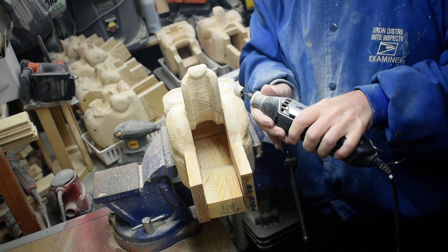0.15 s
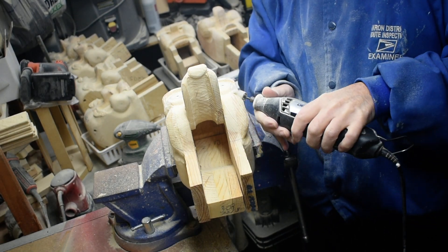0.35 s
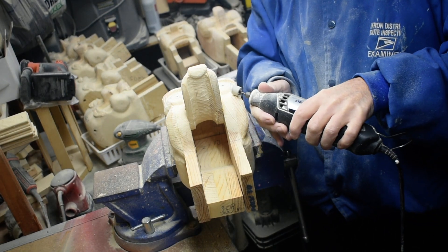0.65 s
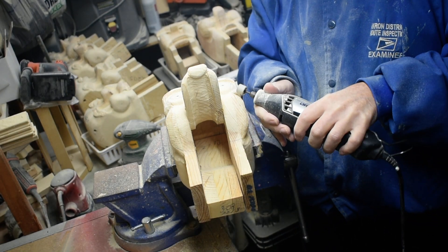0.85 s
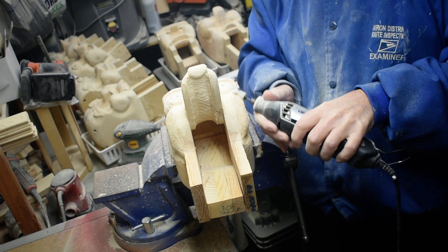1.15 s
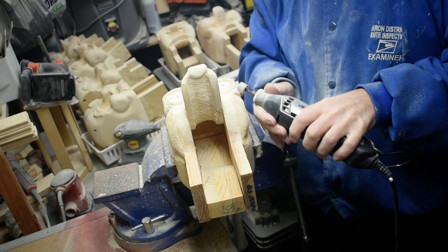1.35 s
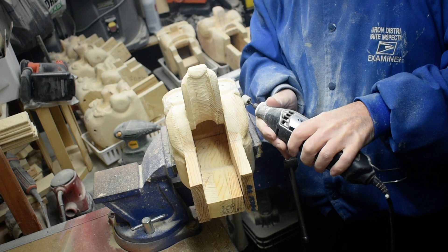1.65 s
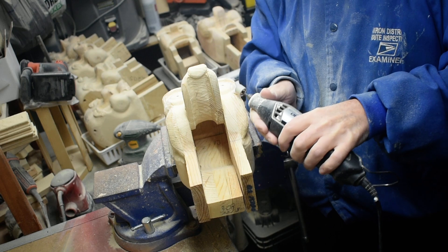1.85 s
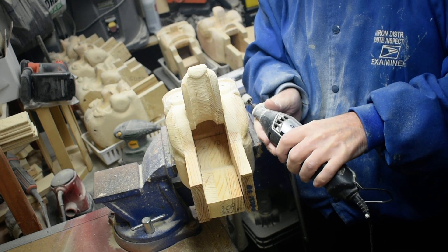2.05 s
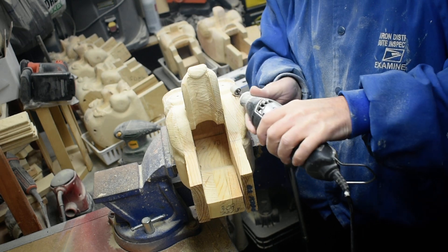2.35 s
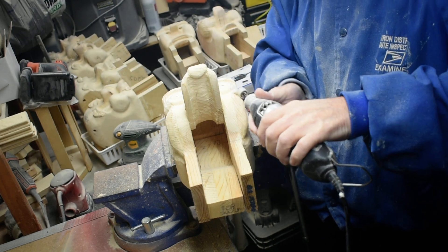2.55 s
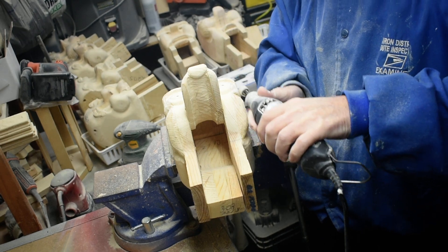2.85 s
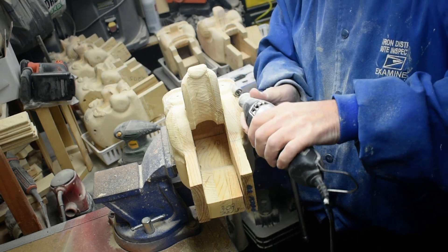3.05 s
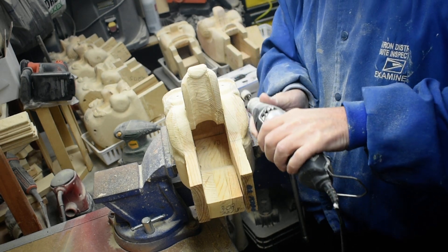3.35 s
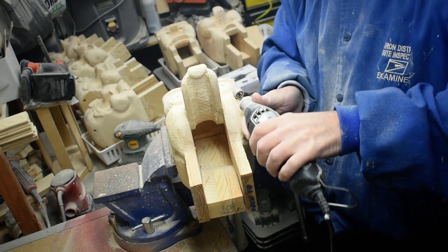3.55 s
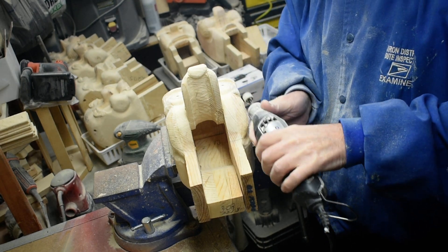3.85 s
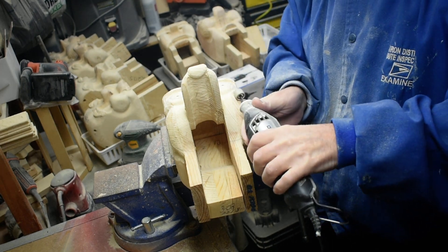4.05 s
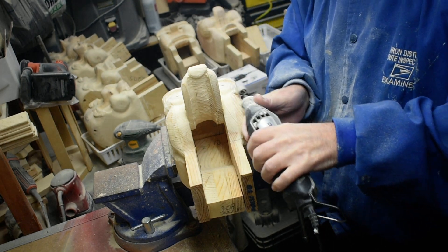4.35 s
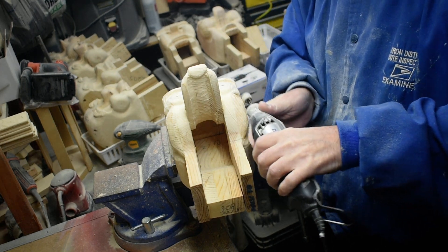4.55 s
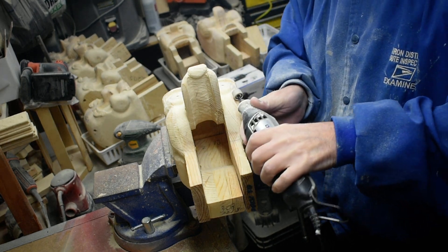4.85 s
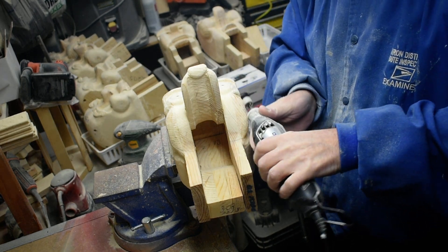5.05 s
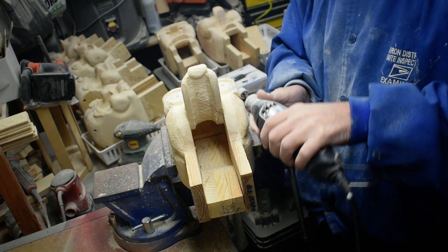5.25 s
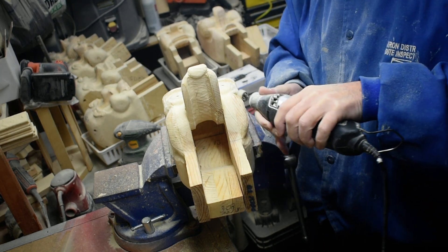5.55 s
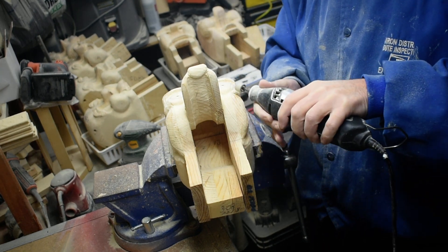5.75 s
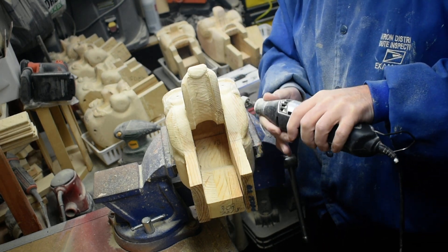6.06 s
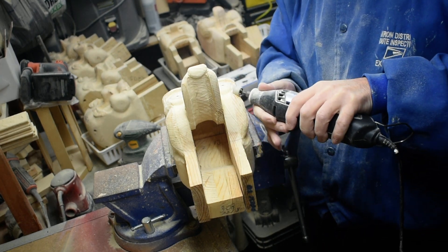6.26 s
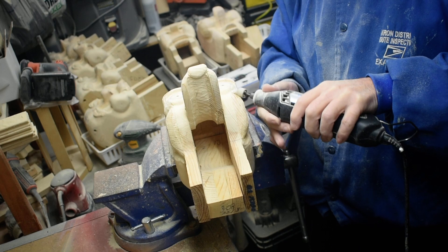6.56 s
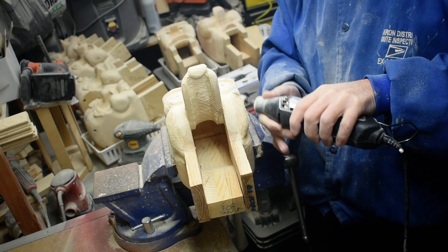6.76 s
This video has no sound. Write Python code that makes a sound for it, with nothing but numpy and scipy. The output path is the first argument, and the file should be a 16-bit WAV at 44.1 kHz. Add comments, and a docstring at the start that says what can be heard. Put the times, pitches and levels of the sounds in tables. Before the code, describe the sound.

A handheld rotary tool whines at high speed, buzzing and dipping in pitch as its bit repeatedly touches wood.

```python
"""Rotary tool carving wood.

A handheld rotary tool whines near full speed in a workshop, close to a mono microphone.
About twice a second its bit touches the wood: the shaft slows and buzzes once per turn,
then spins up again. Brushes and cooling fan hiss; the mains ripple adds side tones."""
import sys
import numpy as np
from scipy import signal
from scipy.io import wavfile
from scipy.ndimage import uniform_filter1d, map_coordinates

SR = 44100
rng = np.random.default_rng(int(sys.argv[2]) if len(sys.argv) > 2 else 0)


def unload_wav(signal):
    """Save mono or channel-first audio to the path in sys.argv[1] as 16-bit WAV at rate SR, clipped to [-1, 1]."""
    wavfile.write(
        sys.argv[1],
        SR,
        np.round(np.clip(np.atleast_2d(signal).T, -1, 1) * 32767).astype(np.int16),
    )


N = 304290
TIME_S = np.arange(N) / SR

# Motor tones as the hands turn the tool. Each row: time in seconds, 12th order in dB, 5th order in dB.
MOTOR_LEVELS = [(0.0, -33, -27), (0.11, -34.5, -46), (0.35, -44, -34), (0.36, -32, -41.5), (0.96, -33, -40),
                (1.06, -35, -32.5), (1.29, -32.5, -40), (1.79, -36.5, -38.5), (1.94, -24.5, -39),
                (1.98, -29.5, -47), (2.06, -31.5, -33.5), (2.54, -26, -33), (2.58, -27.5, -27.5),
                (2.71, -34, -38), (2.77, -32, -32.5), (5.03, -27, -33.5), (5.05, -27, -32),
                (5.38, -31.5, -37), (5.59, -33, -28.5), (5.75, -36.5, -33), (6.76, -33, -40.5),
                (6.9, -33, -35)]
# Commutator whine, fading as the tool moves among reflections. Each row: time in seconds, level in dB.
WHINE_LEVELS = [(0.0, -16), (0.19, -22.5), (0.27, -41), (0.36, -19), (0.46, -28), (0.5, -15), (0.57, -28),
                (0.94, -19.5), (1.06, -36), (1.11, -13.5), (1.25, -29.5), (1.36, -17.5), (1.4, -27),
                (1.67, -17.5), (2.3, -19.5), (2.61, -17), (2.78, -26.5), (2.86, -14.5), (2.96, -21.5),
                (3.28, -14), (3.38, -26), (3.42, -15), (3.8, -18), (4.36, -15), (4.44, -21), (4.65, -13),
                (4.71, -23), (4.84, -11), (4.94, -18.5), (5.01, -11.5), (5.19, -24.5), (5.44, -23.5),
                (5.57, -11), (5.59, -23), (5.69, -17), (5.75, -26.5), (5.8, -16), (6.07, -15.5),
                (6.19, -32.5), (6.47, -12.5), (6.61, -29), (6.63, -19.5), (6.73, -22), (6.76, -33),
                (6.84, -17.5), (6.9, -23)]
# Weaker, constant motor tones. Each row: shaft order, level in dB.
STEADY_ORDERS = [(2, -48), (3, -44.5), (4, -46.5), (6, -55.5), (7, -48), (8, -42.5), (10, -79), (16, -49),
                 (17, -42.5), (21, -42), (22, -57), (23, -43), (25, -44), (36, -49)]
# Side tones above the shaft tone. Each row: ripple multiple, level in dB re the shaft tone.
RIPPLE_SIDEBANDS = [(1, -10), (2, -9.5), (3, -8.5)]
# Strokes of the bit in the wood. Each row: start in seconds, end in seconds, drag as settled speed
# loss in turns per second, then a base buzz level in dB for each of BUZZ_CENTRE_ORDERS.
BIT_STROKES = [(-0.1, 0.047, 40.5, -33.5, -50, -49.0, -58), (0.188, 0.414, 42.6, -37.0, -48, -46.5, -57),
               (0.614, 0.849, 46.6, -45, -41, -51, -60.0), (1.039, 1.226, 63.77, -32, -40.0, -48, -55),
               (1.52, 1.674, 50.8, -30, -38.5, -46, -58), (1.951, 2.106, 62.9, -36.5, -40.5, -44, -56),
               (2.463, 2.741, 73.3, -34.5, -38, -45.5, -57.5), (3.07, 3.263, 93, -35, -38.0, -47, -55),
               (3.592, 3.763, 86.9, -37.5, -37.0, -47, -56),
               (4.089, 4.217, 95.2, -35.5, -35.5, -44.0, -57.0),
               (4.519, 4.597, 114.5, -43, -35.5, -42.5, -60), (4.905, 5.091, 82.9, -40.5, -42.5, -44, -56),
               (5.155, 5.198, 56.74, -62, -36.5, -48.0, -61), (5.434, 5.632, 44.7, -39, -42, -47.0, -54.5),
               (5.907, 6.029, 56.7, -31, -42.5, -47.0, -54),
               (6.268, 6.455, 80.45, -30.5, -43.0, -44.0, -57), (6.705, 6.78, 89.1, -28.5, -42, -47, -50)]
# Centres of the four buzz bands. Each entry: shaft order.
BUZZ_CENTRE_ORDERS = [3, 8, 17, 30]
# Buzz spectrum. Each row: shaft order, gain in dB on the base level.
BUZZ_COLOUR = [(2, -8), (3, -2), (4, -4.5), (6, -1.5), (7, -1), (10, 0.5), (13, 4.5), (16, 4), (20, 11),
               (26, 15.5), (30, 15), (36, 12)]
# Ringing spots of the wood. Each row: start in seconds, length in seconds, shaft order, level in dB.
WOOD_SQUEALS = [(1.128, 0.063, 20, -27), (2.482, 0.08, 8, -41), (2.523, 0.11, 7, -33),
                (3.07, 0.059, 7, -28.5), (3.06, 0.063, 21, -29), (3.604, 0.15, 13, -33),
                (3.664, 0.054, 7, -27), (4.065, 0.07, 9, -37), (4.099, 0.12, 13, -34),
                (4.936, 0.15, 7, -38), (4.995, 0.095, 13, -33), (5.067, 0.11, 8, -40.5),
                (6.349, 0.07, 20, -41), (6.617, 0.12, 8, -45)]
# Hiss spectrum. Each row: frequency in Hz, relative density in dB.
HISS_COLOUR = [(30, -35), (100, -39.5), (220, -37), (330, -24), (600, -23), (800, -12), (1500, -11),
               (2700, -7), (4500, -9), (8000, -5.5), (11700, -7.5), (13200, -12), (14900, -11.5),
               (15900, -21)]
# Resonances in the hiss. Each row: centre in Hz, width in Hz, boost in dB.
SHELL_RESONANCES = [(392, 120, 7.5), (977, 386, 11.5), (1990, 500, 10), (3007, 35, 9), (3880, 360, 5),
                    (5220, 840, 7.5), (6300, 290, 4), (7170, 560, 6), (9330, 870, 4.5), (10520, 120, 13),
                    (12900, 700, 4.5)]

FREE_SPEED_HZ, START_SAG_HZ, INERTIA_S = 466.7, 33.5, 0.62
UNBALANCE_DB, TURN_AWAY_DB_PER_S = -40, -0.25
DAMPING_DB_PER_HZ, DAMPING_S = -0.0313, 0.015  # the wood steadies the bit
DIG_S, LIFT_S = 0.0975, 0.0786
BUZZ_LEAD_S, BUZZ_LAG_S = 0.021, 0.014
LANDING_DB, LIFTING_DB = [-7.5, -0.5, -0.5, -7], [1, -1.5, 0, -2]  # per band, re mid-stroke
RIPPLE_HZ, HUM_DB, HISS_DB = 120, -63.5, -24.5
LOW_CUT_HZ, HIGH_CUT_HZ = 150, 15700


def motor(angle):
    """Commutator, fan blades and unbalance sing on whole orders; the ripple shakes the shaft tone."""
    twelfth_db, fifth_db = curves(MOTOR_LEVELS)
    drag_hz = wood_drag_hz()
    damping_db = DAMPING_DB_PER_HZ * lagged(drag_hz, DAMPING_S, drag_hz[0])
    shaft_db = UNBALANCE_DB + TURN_AWAY_DB_PER_S * TIME_S + damping_db
    ripple = 2 * np.pi * RIPPLE_HZ * TIME_S
    out = tone(24 * angle, curves(WHINE_LEVELS)[0], rough=0.38, waver_hz=48.45)
    out += tone(12 * angle, twelfth_db, rough=0.35, waver_hz=25.99)
    out += tone(5 * angle, fifth_db, rough=0.41, waver_hz=22.09)
    out += tone(angle, shaft_db, rough=0.21, waver_hz=11)
    for order, db in STEADY_ORDERS:
        out += tone(order * angle, db, rough=0.35, waver_hz=9.5)
    for multiple, db in RIPPLE_SIDEBANDS:
        out += tone(angle + multiple * ripple, shaft_db + db, rough=0.23, waver_hz=13)
    return out + tone(2 * ripple, HUM_DB, rough=0.29, waver_hz=11)


def shaft_angle():
    """Shaft angle in radians; inertia rounds every change of load."""
    speed_hz = FREE_SPEED_HZ - lagged(wood_drag_hz(), INERTIA_S, START_SAG_HZ)
    jitter = 1 + 0.00019 * wander(30).real
    return 2 * np.pi * np.cumsum(speed_hz * jitter) / SR


def wood_drag_hz():
    """Load of the wood on the bit, ramping in and out with each stroke."""
    drag_hz = np.zeros(N)
    for start_s, end_s, load_hz, *_ in BIT_STROKES:
        dig = np.clip((TIME_S - start_s) / DIG_S + 0.5, 0, 1)
        lift = np.clip((end_s - TIME_S) / LIFT_S + 0.5, 0, 1)
        drag_hz += load_hz * dig * lift
    return drag_hz


def cutting_buzz(angle):
    """One blow a turn, changing in shape: every order wavers on its own; chips rasp in step."""
    bands_db = contact_db()
    orders, colour_db = np.transpose(BUZZ_COLOUR)
    chatter_db = 3 * wander(32).real  # the bit skips over the grain, shaking the high orders together
    out = np.zeros(N)
    for order in set(range(2, 37)) - {5, 12, 24}:  # these three belong to the motor
        shares = [np.interp(np.log(order), np.log(BUZZ_CENTRE_ORDERS), band) for band in np.eye(4)]
        db = shares @ bands_db + shares[-1] * chatter_db + np.interp(order, orders, colour_db)
        phase = order * angle + rng.uniform(0, 2 * np.pi)
        out += tone(phase, db, rough=1.52, waver_hz=16 + 1.6 * order)
    chips = np.diff(rng.standard_normal(N + 1)) * np.exp(0.8 * np.cos(angle))
    rasp_db = bands_db[-1] + 13 + chatter_db
    return out + gain_of(rasp_db) * unit_rms(chips)


def contact_db():
    """Buzz band levels over time: the bit lands quickly, digs in and lifts a little slower."""
    bands_db = np.full((len(BUZZ_CENTRE_ORDERS), N), -99.0)
    for start_s, end_s, _, *middle_db in BIT_STROKES:
        start_s, end_s = start_s - BUZZ_LEAD_S, end_s + BUZZ_LAG_S
        land_db, lift_db = np.add(middle_db, LANDING_DB), np.add(middle_db, LIFTING_DB)
        envelope = [(start_s - 0.012, *(land_db - 30)), (start_s + 0.0055, *land_db),
                    ((start_s + end_s) / 2, *middle_db),
                    (end_s - 0.012, *lift_db), (end_s + 0.025, *(lift_db - 30))]
        bands_db = np.maximum(bands_db, curves(envelope))
    return bands_db


def squeals(angle):
    """Single orders swell briefly as the bit finds a ringing spot of the wood."""
    out = np.zeros(N)
    for start_s, length_s, order, db in WOOD_SQUEALS:
        swell = np.exp(-(2 * (TIME_S - start_s) / length_s - 1) ** 4)
        out += swell * np.sqrt(2) * gain_of(db) * np.cos(order * angle)
    return out


def fan_and_brush_hiss(angle):
    """Fan air and brush scrape: patchy noise, throbbing with ripple and shaft."""
    frames, hz = N // 256 + 5, np.fft.rfftfreq(1024, 1 / SR)
    real, imag, patches = rng.standard_normal((frames, 513, 3)).T
    patches = uniform_filter1d(patches, size=10, axis=0)
    patches_db = 1.31 * unit_rms(uniform_filter1d(patches, size=10, axis=1))
    knots_hz, knots_db = np.transpose(HISS_COLOUR)
    colour_db = np.interp(np.log(hz + 1), np.log(knots_hz + 1), knots_db)
    for centre_hz, width_hz, boost_db in SHELL_RESONANCES:
        colour_db += boost_db / (1 + (2 * (hz - centre_hz) / width_hz) ** 2)
    spectrum = (real + 1j * imag) * gain_of(colour_db[:, None] + patches_db)
    air = unit_rms(signal.istft(spectrum, nperseg=1024, noverlap=768)[1][:N])
    throb = 1 + 0.019 * np.cos(2 * np.pi * RIPPLE_HZ * TIME_S) + 0.12 * np.cos(angle)
    return gain_of(HISS_DB) * air * throb


def tone(phase, db, rough, waver_hz):
    """Sine of given rms level, wavering in amplitude and phase."""
    waver = unit_rms(1 + rough * wander(waver_hz))
    return np.sqrt(2) * gain_of(db) * (np.exp(1j * phase) * waver).real


def wander(rate_hz):
    """Slow complex noise of rms 1, changing about rate_hz times a second."""
    knots = rng.standard_normal((2, 800))
    grid = np.arange(0, N + 64, 64)
    real, imag = (map_coordinates(row, [grid / SR * rate_hz], order=3) for row in knots)
    return unit_rms(np.interp(np.arange(N), grid, real + 1j * imag))


def curves(table):
    """Level columns of a timed table, interpolated to every sample."""
    times_s, *columns = np.transpose(table)
    return [np.interp(TIME_S, times_s, column) for column in columns]


def lagged(x, tau_s, initial):
    """First-order lag from an initial value."""
    pole = np.exp(-1 / (SR * tau_s))
    return signal.lfilter([1 - pole], [1, -pole], x, zi=[initial * pole])[0]


def gain_of(db):
    return 10 ** (np.asarray(db) / 20)


def unit_rms(x):
    return x / np.sqrt(np.mean(abs(x) ** 2) + 1e-20)


def scene():
    """One shaft drives every layer; both channels are equal."""
    angle = shaft_angle()
    tool = motor(angle) + cutting_buzz(angle) + squeals(angle) + fan_and_brush_hiss(angle)
    return np.tile(tool, (2, 1))


def record(dry):
    """Microphone bass cut, then a steep band limit."""
    low_cut = signal.butter(2, LOW_CUT_HZ, "high", fs=SR, output="sos")
    high_cut = signal.firwin(1023, HIGH_CUT_HZ, window=("kaiser", 9), fs=SR)
    return signal.oaconvolve(signal.sosfilt(low_cut, dry), high_cut[None], "same")


dry = scene()
out = record(dry)
unload_wav(out)
```